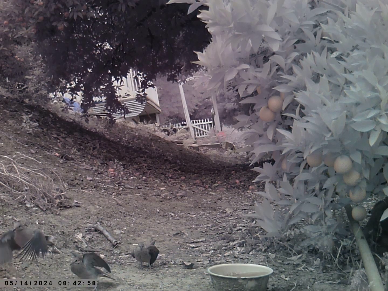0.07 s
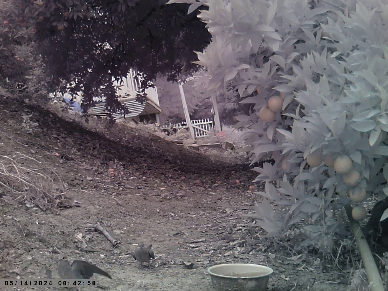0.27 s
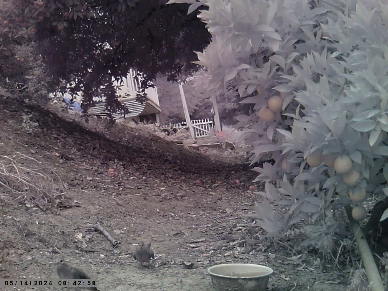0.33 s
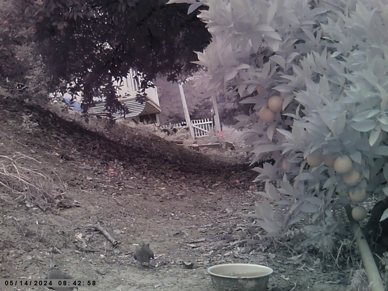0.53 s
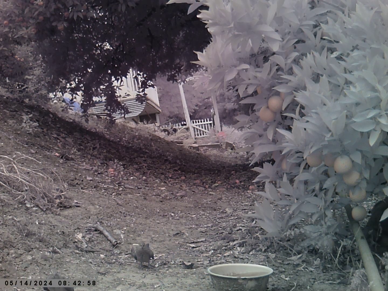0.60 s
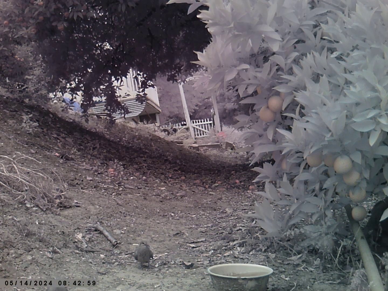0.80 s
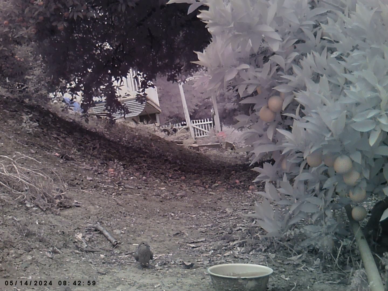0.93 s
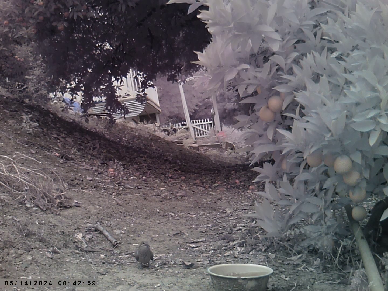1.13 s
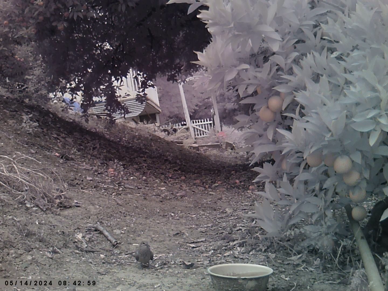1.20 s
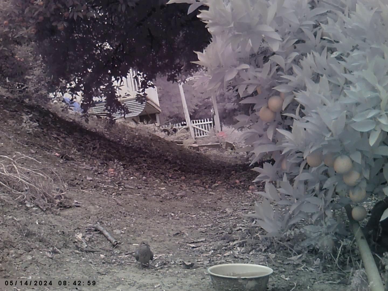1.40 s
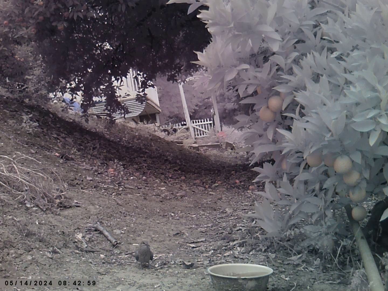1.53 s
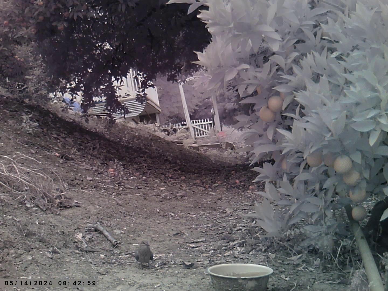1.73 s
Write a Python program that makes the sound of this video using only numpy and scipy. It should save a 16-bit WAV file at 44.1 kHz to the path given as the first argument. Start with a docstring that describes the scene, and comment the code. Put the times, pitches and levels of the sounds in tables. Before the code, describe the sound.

Two doves take off near the microphone with fast whistling wingbeats, soft claps and puffs of air while dry litter ticks. As the wings fade, a small bird farther off gives one thin rising whistle in the quiet backyard.

```python
"""Two doves take off

Two doves leave a quiet backyard close by, one after the other. On each downstroke their flight
feathers whistle and hiss. The wings push air, and the first beats start with a soft clap.
Dry litter ticks, and a small bird further off gives one thin rising whistle that echoes in the trees."""
import sys
import numpy as np
from scipy import signal
from scipy.fft import rfft, irfft, next_fast_len
from scipy.io import wavfile
from scipy.ndimage import map_coordinates

SR = 44100
rng = np.random.default_rng(int(sys.argv[2]) if len(sys.argv) > 2 else 0)


def transcribe(u):
    """Save the signal u as a 16-bit wav file named by the first command-line argument.

    u: samples, shape (n,) or (channels, n), limited to [-1, 1]; the rate is SR.
    q: integer samples, one column per channel.
    """
    v = np.clip(np.atleast_2d(u).T, -1, 1)
    q = np.round(v * 32767).astype(np.int16)
    wavfile.write(sys.argv[1], SR, q)


N = 77175

# Downstrokes: t/s, length/s, top f/Hz, whistle level/dB, 2nd and 3rd harmonic/dB (relative to the
# whistle), hiss level/dB, loudest point (0 to 1), depth of the pitch bend
WINGBEATS = [(0.172, .030, 2042, -42, -11.5, -12, -49.5, 0.33, 0.74),
             (.259, 0.035, 2298, -36, -7.5, -14.5, -45.5, .32, 1.11),
             (0.342, 0.035, 2478, -37.5, -1, -13, -44, .21, 1.58),
             (0.424, 0.04, 2316, -38, -2.5, -14.5, -47, 0.25, 1.07),
             (0.508, 0.041, 2302, -41.5, -2.5, -19, -47.5, 0.36, 0.952),
             (0.597, 0.044, 2161, -48.5, 0, -7.5, -48, 0.44, 0.43),
             (0.686, 0.038, 2134, -36.5, -10, -14, -45.5, 0.56, 0.37),
             (.807, 0.042, 2107, -38, -9.5, -13, -48, 0.49, 0.39),
             (0.93, 0.039, 2064, -43.5, -8.5, -17, -49.5, 0.37, 0.67),
             (1.036, 0.037, 1821, -53.5, -10.5, -3, -58.5, 0.42, .35),
             (1.15, 0.019, 1816, -62, -12, 9.5, -64, 0.12, 0.36),
             (1.174, 0.017, 1714, -70.5, 2, 5.5, -57.5, .4, 0.64),
             (1.273, 0.0325, 2070, -57.5, -21, -11, -60.5, 0.37, 0.43),
             (1.403, 0.031, 1903, -66, -12, -13, -58, 0.1, 0.2),
             (1.541, 0.031, 2115, -65.5, 1, -3, -64, 0.19, 0.28),
             (1.657, 0.041, 1986, -67, 1, -17, -76, 0.22, 0.11)]
# Tone colour of air rushing through feathers: f/Hz, level/dB
HISS_COLOUR = [(300, -17), (900, -14), (1500, -2), (2000, 1.5), (2500, -5), (2900, -5.5), (3400, -9),
               (4300, 4), (5400, 6.5), (6500, -4), (7500, -12), (10000, -15.5), (15000, -38)]
# Tone colour of dry ticks and crackles: f/Hz, level/dB
TICK_COLOUR = [(500, -14.5), (2500, -8.5), (5200, -2.5), (8000, -13), (15000, -21.5)]


def amp(db):
    """Turns decibels into a number to multiply by."""
    return 10 ** (np.asarray(db) / 20)


def unit(x):
    """Scales a sound to an average (rms) level of 1."""
    return x / np.sqrt(np.mean(x ** 2) + 1e-20)


def clock():
    """The time of every sample, in seconds."""
    return np.arange(N) / SR


def along(points, hz):
    """Reads between (f/Hz, value) points on a logarithmic frequency scale."""
    freqs, values = np.transpose(points)
    return np.interp(np.log(hz + 1), np.log(freqs + 1), values)


def curves(rows):
    """Gives one value per sample for each column after the time."""
    times, *columns = np.transpose(rows)
    return [np.interp(clock(), times, column) for column in columns]


def wobble(rate):
    """A smooth curve through `rate` random values a second."""
    return map_coordinates(rng.standard_normal(4096), [clock() * rate], mode="mirror")


def filtered(x, response):
    """Turns each frequency up or down by response(hz)."""
    size = next_fast_len(N + SR // 2)
    return irfft(rfft(x, size) * response(np.fft.rfftfreq(size, 1 / SR)), size)[:N]


def noise(colour):
    """Noise with the given tone colour, at an average level of 1."""
    return unit(filtered(rng.standard_normal(N), lambda hz: amp(along(colour, hz))))


def bursts(rows, attack_s, decay_s):
    """A loudness curve with one sharp peak for each (t/s, level/dB) row."""
    t = clock()
    return sum(amp(db) * np.exp(-np.maximum((at - t) / attack_s, (t - at) / decay_s)) for at, db in rows)


def echo(x, decay):
    """Many reflections blur into a tail in which each frequency fades at its own speed."""
    hz, t, spectrum = signal.stft(rng.standard_normal(SR // 2), SR, nperseg=256)
    fade = amp(-60 * t / along(decay, hz)[:, None])
    tail = signal.istft(spectrum * fade, SR, nperseg=256)[1]
    return signal.fftconvolve(x, tail / np.linalg.norm(tail))[:N]


def ground_echoes(x, count=8, latest_s=0.012):
    """A few quick echoes bounce off the soil and the nearest leaves."""
    delays, signs = rng.uniform(0.001006, latest_s, count), rng.choice([-1, 1], count)
    copies = (sign * np.pad(x, (int(delay * SR), 0))[:N] for delay, sign in zip(delays, signs))
    return sum(copies) / np.sqrt(count)


def yard():
    """The faint, steady hush of the yard."""
    # Tone colour of the hush: f/Hz, level/dB
    colour = [(59, 4), (100, -1), (140, 1), (387, -9), (412, -9), (477, -6), (819, -7), (1140, -12.5),
              (1920, -17), (2420, -19.5), (3820, -28.5), (4910, -25), (14500, -20.5)]
    return amp(-60.5) * noise(colour)


def songbird(waver=0.0026, sweep_waver=0.0082):
    """A small bird holds one thin note that turns unsteady as it sweeps upward at its end."""
    # Path of the note: t/s, f/Hz, level/dB
    song = [(1.235, 4700, -76), (1.26, 4672, -61.5), (1.285, 4747, -52), (1.322, 4674, -67),
            (1.358, 4783, -72), (1.371, 4720, -52.5), (1.392, 5160, -55), (1.41, 5530, -57),
            (1.423, 6200, -59), (1.441, 6870, -57.5), (1.456, 6690, -65), (1.47, 6750, -82)]
    hz, db = curves(song)
    singing = (clock() > song[0][0]) & (clock() < song[-1][0])
    steepness = abs(np.gradient(hz) / np.gradient(hz).max())
    hz = hz * (1 + (waver + sweep_waver * np.sqrt(steepness)) * wobble(290))
    return singing * amp(db) * np.sin(2 * np.pi * np.cumsum(hz) / SR)


def litter(grain_db=3):
    """Dry litter ticks and rustles as the doves leave the ground."""
    # Rustle of feathers and litter: t/s, level/dB
    rustle_levels = [(0, -72), (.2, -63), (.32, -58), (.55, -60.5), (.78, -62), (.9, -75), (1.2, -67.5),
                     (1.75, -71.5)]
    # Single dry ticks: t/s, level/dB
    ticks = [(.660, -43.5), (.757, -53), (.770, -67), (.777, -66), (.876, -44.5), (1.151, -59)]
    grains = unit(noise(TICK_COLOUR) * amp(grain_db * wobble(400)))
    rustle = amp(curves(rustle_levels)[0]) * grains
    return rustle + noise(TICK_COLOUR) * bursts(ticks, attack_s=0.00037, decay_s=0.0014)


def pushed_air():
    """Each wing push is a dip in air pressure between two swells, over an uneven draught."""
    # Strength of the draught: t/s, level/dB
    draught = [(0, -55), (.2, -48.5), (.32, -44.5), (.75, -42), (.88, -45.5), (1.0, -50), (1.2, -52.5),
               (1.32, -48.5), (1.52, -48.5), (1.6, -56.5), (1.75, -53)]
    # Tone colour of the draught: f/Hz, level/dB
    rumble = [(8, -2), (22, -6), (38, -0.5), (70, -4.5), (110, -17), (200, -25.5), (500, -36.5),
              (2000, -75)]
    # Pressure dips: t/s, half width/s, level/dB
    pushes = [(0.255, 0.0067, -36), (.338, 0.004, -27.5), (0.417, 0.0032, -34), (.505, 0.0037, -31.5),
              (.533, 0.017, -37), (0.587, 0.005, -37.5), (0.628, .012, -32), (0.72, 0.014, -30),
              (0.827, 0.023, -34.5), (0.946, 0.01, -37)]
    out = amp(curves(draught)[0]) * noise(rumble)
    for at, half_width, db in pushes:
        offset = (clock() - at) / half_width
        out -= amp(db) * (1 - offset ** 2) * np.exp(-offset ** 2 / 2)
    return out


def claps():
    """The wings brush together at the top of the first beats."""
    # Wing claps: t/s, level/dB
    hits = [(.164, -48.5), (.252, -51.5), (.337, -43), (.419, -41), (.504, -41), (.589, -44), (.681, -49)]
    # Tone colour of a clap: f/Hz, level/dB
    colour = [(200, -16), (700, -5), (1500, 7), (3000, -6), (5200, 4.5), (8000, -14), (15000, -32)]
    return noise(colour) * bursts(hits, attack_s=0.0018, decay_s=0.0034)


def upstrokes(length_s=0.019, sag=0.19, hiss_db=-15):
    """A rising wing gives a faint falling note, about an octave below the downstroke's whistle."""
    # Upstroke notes: middle t/s, f/Hz, level/dB
    notes = [(0.238, 1200, -62), (0.318, 1430, -54), (0.406, 1140, -49.5), (0.488, 1070, -47.5),
             (.574, 1070, -55), (0.666, 1020, -57)]
    out, hiss = np.zeros(N), amp(hiss_db) * noise(HISS_COLOUR)
    waver = 1 + 0.04 * wobble(300)
    for middle, hz, db in notes:
        progress = np.clip((clock() - middle) / length_s + .5, 0, 1)
        pitch = hz * waver * (1 - sag * (progress - .5))
        tone = np.sin(2 * np.pi * np.cumsum(pitch) / SR)
        swell = np.sin(np.pi / 2 * np.interp(progress, [0, 0.52, 1], [0, 1, 0])) ** 1.3
        out += amp(db) * swell * (tone + hiss)
    return out


def pitch_arch(progress, depth, top_at=0.248):
    """A feather's pitch rises early in the stroke, sags, then drops as the wing stops."""
    early = np.maximum(1 - progress / top_at, 0)
    late = np.maximum(progress - top_at, 0) / (1 - top_at)
    return 1 - depth * (0.263 * early ** 2 + 0.1326 * late + .27 * late ** 6)


def feather(pitch_ratio, flutter_per_s=480, attack_s=.005, release_s=.004, fade_db=19):
    """One wing's fluttering feather whistles, brightest where the stroke is hardest."""
    t, out = clock(), np.zeros(N)
    waver = pitch_ratio * (1 + .026 * wobble(flutter_per_s))
    shake_low, shake_mid, shake_high = [amp(3 * wobble(flutter_per_s)) for _ in range(3)]
    for start, length, hz, db, second_db, third_db, _, peak, depth in WINGBEATS:
        on = (t > start) & (t < start + length)
        age = t[on] - start
        progress = age / length
        phase = 2 * np.pi * np.cumsum(hz * pitch_arch(progress, depth) * waver[on]) / SR
        edges = np.clip(np.minimum(age / attack_s, (length - age) / release_s), 0, 1)
        force = edges * amp(-fade_db * abs(progress - peak))
        note = shake_low[on] * np.sin(phase)
        octave = shake_mid[on] * amp(second_db) * np.sin(2 * phase)
        upper = shake_high[on] * (amp(third_db) * np.sin(3 * phase) + amp(-28.5) * np.sin(4 * phase))
        out[on] += np.sqrt(2) * amp(db) * force * (note + np.sqrt(force) * (octave + upper))
    return out


def wing_hiss(attack_s=0.0034, release_s=0.0098, fade_db=11, snaps_per_s=290, grain_db=1.5):
    """Air rasps through the wings on each downstroke, and feathers crackle as they snap past each other."""
    t, flow = clock(), np.zeros(N)
    for start, length, *_, db, peak, _ in WINGBEATS:
        age = t - start
        edges = np.clip(age / attack_s, 0, 1) * np.exp(-np.maximum(age - length, 0) / release_s)
        flow += amp(db - fade_db * abs(age / length - peak)) * edges
    snaps = (rng.random(N) < snaps_per_s / SR) * rng.standard_normal(N)
    crackle = unit(filtered(snaps, lambda hz: amp(along(TICK_COLOUR, hz))))
    rasp = unit(noise(HISS_COLOUR) * amp(grain_db * wobble(530)))
    return flow * (rasp + amp(-10) * crackle)


def downstrokes():
    """Both wings hiss and whistle; one sounds lower, so the two notes clash roughly."""
    return wing_hiss() + feather(pitch_ratio=1) + amp(-7.5) * feather(pitch_ratio=.885)


def scene():
    """Near wings and a far song, partly hidden by leaves, in the still yard."""
    # Echo of the trees: f/Hz, time to fade by 60 dB/s
    trees = [(200, 0.27), (2000, 0.2), (6000, 0.49), (14000, 0.39)]
    # Short echo of the leaves around the small bird: f/Hz, time to fade by 60 dB/s
    leaves = [(200, 0.073), (6000, 0.26), (14000, 0.2)]
    takeoff = downstrokes() + upstrokes() + claps() + litter()
    song = songbird()
    near = takeoff + amp(-22) * ground_echoes(takeoff) + amp(-16.5) * echo(takeoff, trees)
    far = amp(-2) * song + echo(song, leaves) + amp(-3) * echo(song, trees)
    return (near + far + pushed_air() + yard())[None]


def record(dry, top_hz=15720):
    """Cuts away the very highest treble."""
    return filtered(dry[0], lambda hz: hz < top_hz)[None]


dry = scene()
out = record(dry)
transcribe(out)
```